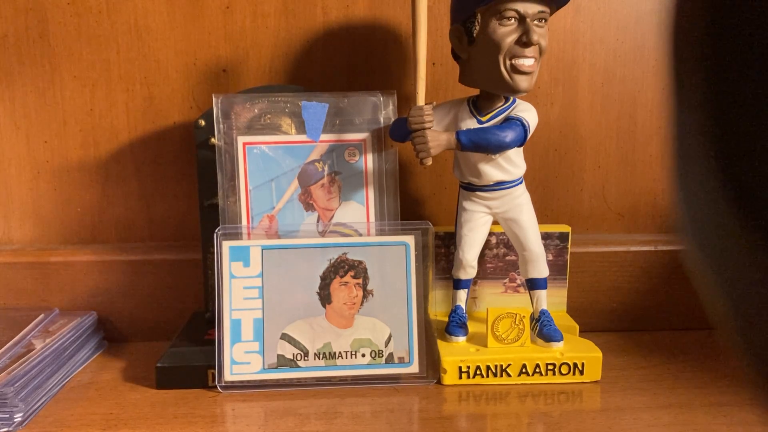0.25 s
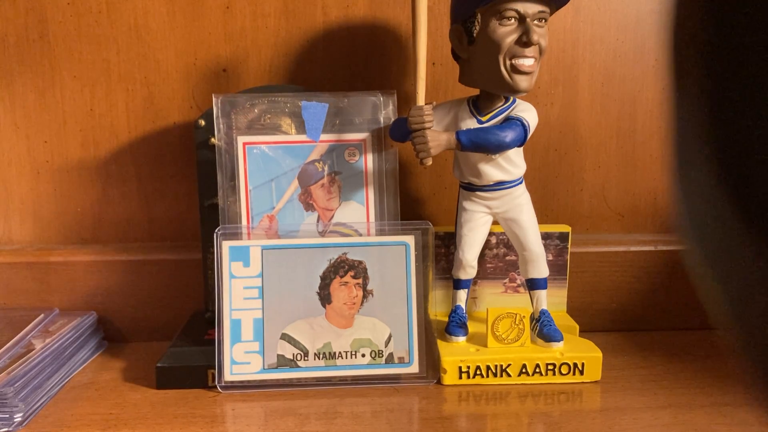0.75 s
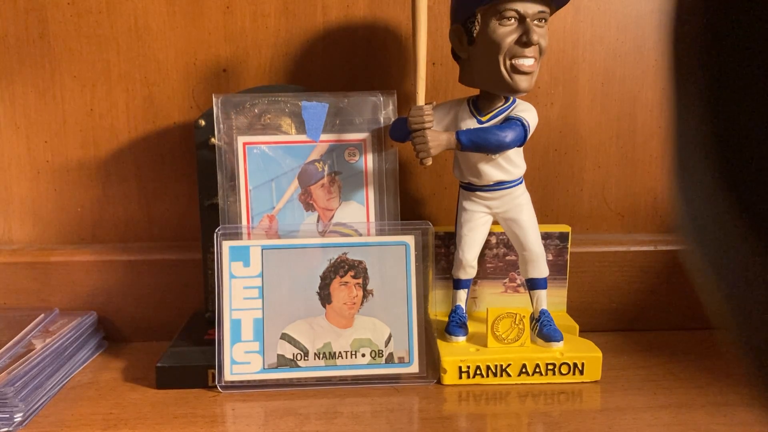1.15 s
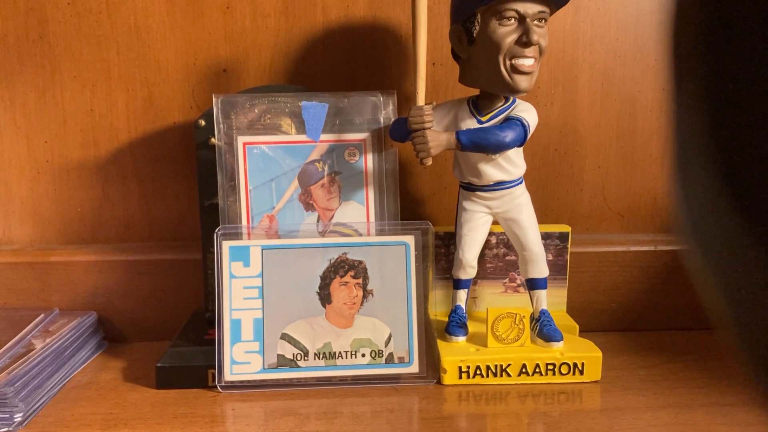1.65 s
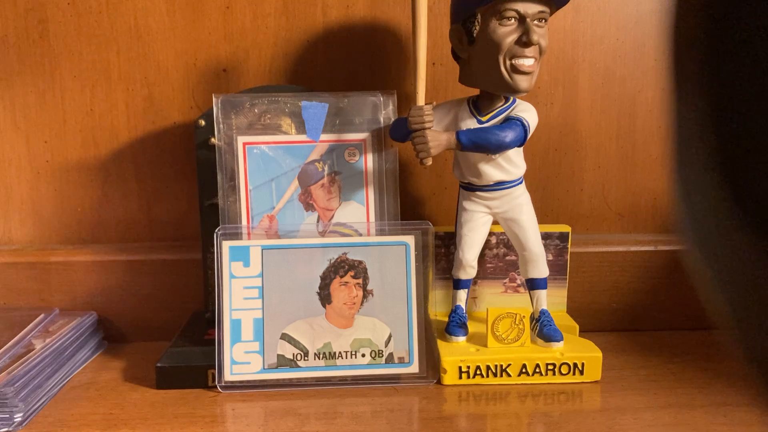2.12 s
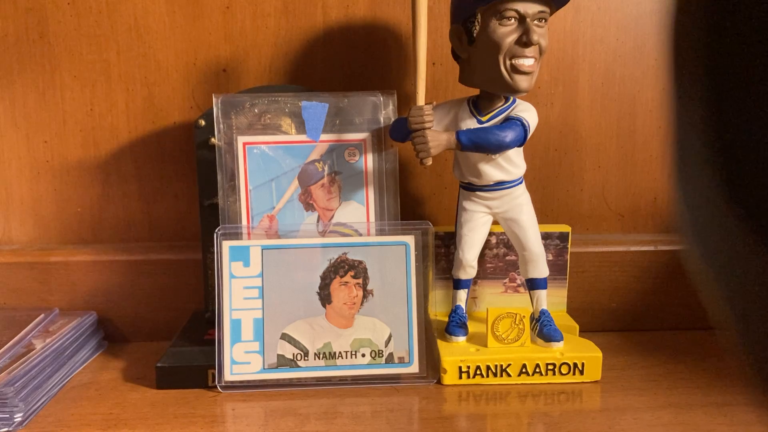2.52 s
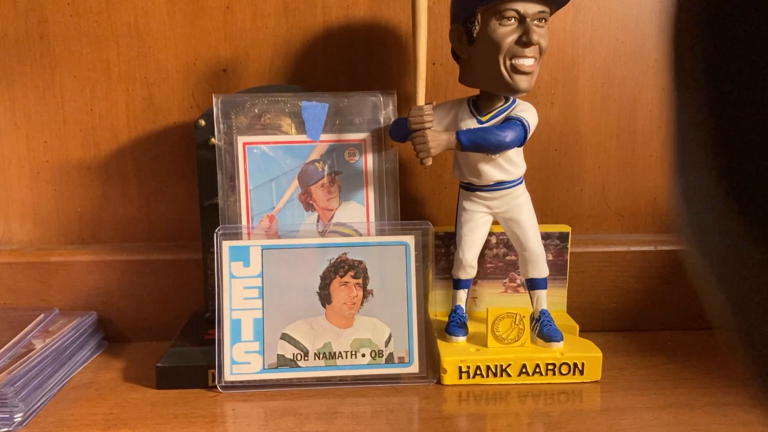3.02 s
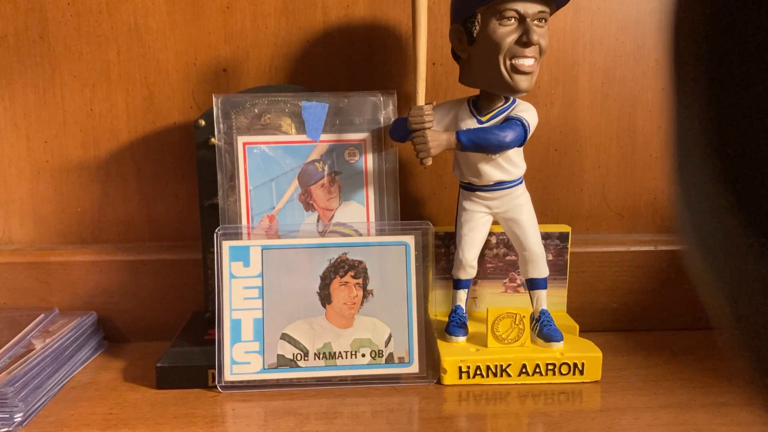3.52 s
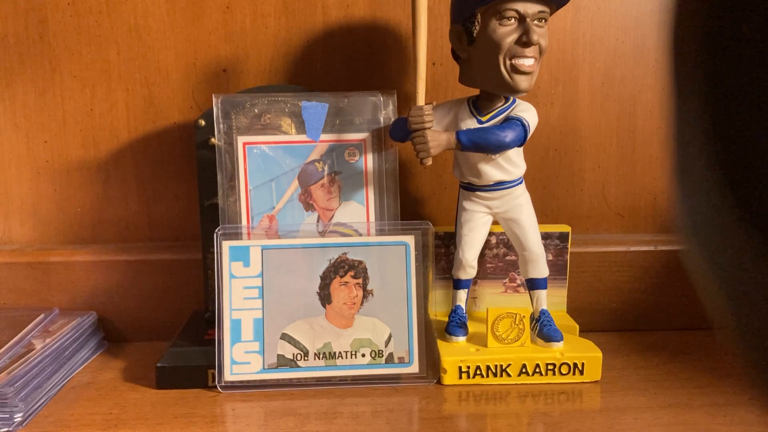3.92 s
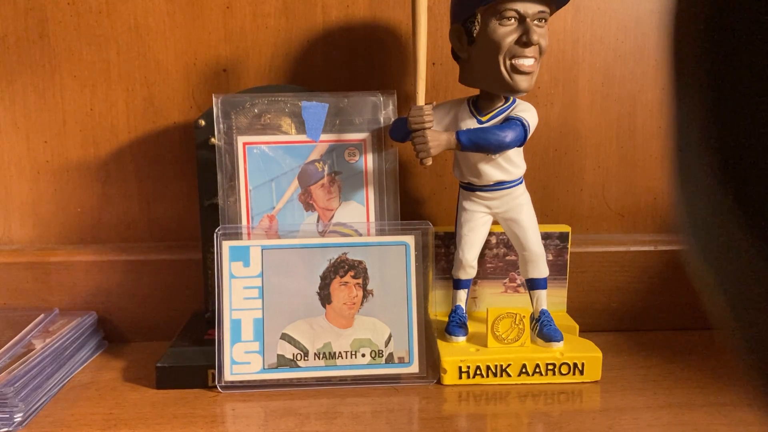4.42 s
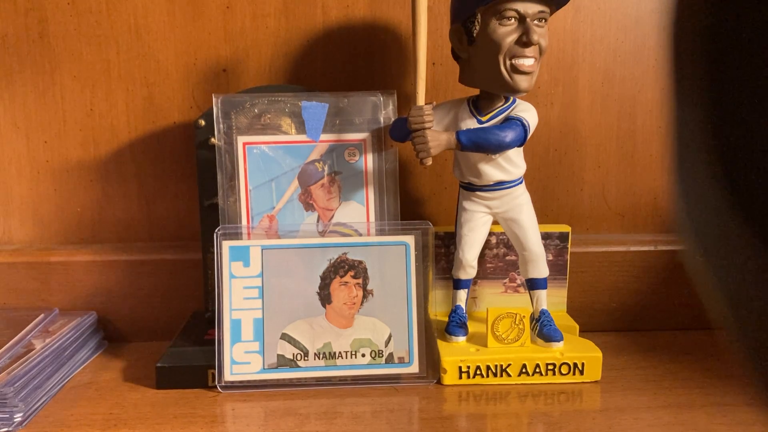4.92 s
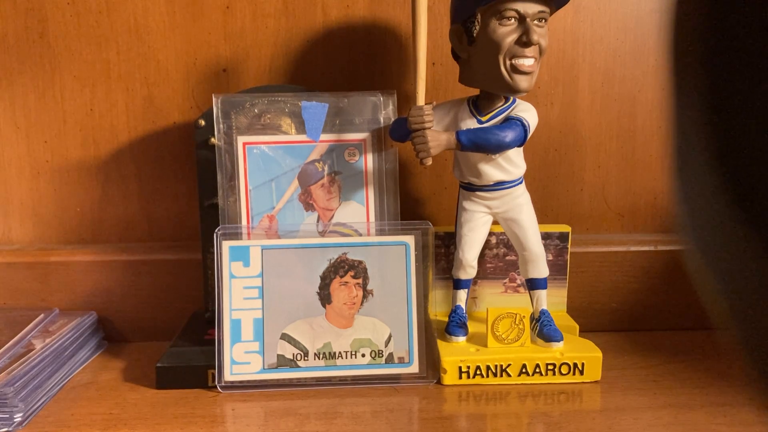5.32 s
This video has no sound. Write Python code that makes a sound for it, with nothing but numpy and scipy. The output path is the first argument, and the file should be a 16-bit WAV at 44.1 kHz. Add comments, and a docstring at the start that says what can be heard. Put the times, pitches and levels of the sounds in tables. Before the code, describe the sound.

A card is worked into a soft sleeve and rigid plastic holder close to the microphone on a wooden desk. Crisp snaps and brief rustles fill the first second, then sparse ticks lead to a dense clicking bout just before three seconds. A few faint clicks follow. Low air-duct rumble and motor hum continue throughout the small indoor room.

```python
"""From start to end an air duct rumbles in the room's low modes, a motor hums and air hisses faintly.
In the first second a card is worked into a soft sleeve and a stiff plastic holder beside a phone on a
wooden desk: film rustles by stick-slip, the holder snaps by sudden release and knocks the desk.
Sparser snaps lead to a dense bout near 2.8 s; a few more follow to 5.1 s, then the room is left alone."""
import sys
import numpy as np
from scipy import signal
from scipy.fft import rfft, irfft, next_fast_len
from scipy.io import wavfile
from scipy.ndimage import uniform_filter1d, map_coordinates

SR = 44100
rng = np.random.default_rng(int(sys.argv[2]) if len(sys.argv) > 2 else 0)


def bounce(signal):
    """Save signal as a 16-bit WAV file at the path given by the first command-line argument."""
    frames = np.transpose(np.atleast_2d(signal))
    limited = np.clip(frames, -1, 1)
    pcm = np.round(limited * 32767).astype(np.int16)
    wavfile.write(sys.argv[1], SR, pcm)


N = 245545


def amp(db):
    """Level law: the amplitude gain of a level in dB."""
    return 10 ** (np.asarray(db) / 20)


def unit(x):
    """Normalization: the signal scaled to rms 1."""
    return x / np.sqrt(np.mean(x ** 2) + 1e-20)


def along(points, hz):
    """Logarithmic frequency scale: (frequency, value) points interpolated on it."""
    f, v = np.transpose(points)
    return np.interp(np.log(hz + 1), np.log(f + 1), v)


def curves(rows):
    """Linear interpolation in time: one curve for each column after the time."""
    s, *columns = np.transpose(rows)
    return [np.interp(np.arange(N) / SR, s, column) for column in columns]


def wobble(rate):
    """Slow random modulation: a smooth curve through rate random knots a second."""
    knots = rng.standard_normal(int(N * rate / SR) + 4)
    return map_coordinates(knots, [np.arange(N) * rate / SR])


def filtered(x, response):
    """Linear filtering: the spectrum times a complex response of frequency."""
    m = next_fast_len(x.shape[-1] + SR // 8)
    spectrum = rfft(x, m) * response(np.fft.rfftfreq(m, 1 / SR))
    return irfft(spectrum, m)[..., :x.shape[-1]]


def modes(table):
    """Modal superposition: damped resonances of alternating sign, rolled off above the top one."""
    top_hz = 1.53 * max(table)[0]

    def response(f):
        total = 0
        for k, (centre, width, db) in enumerate(table):
            damping = 1j * f * width
            total = total + (-1) ** k * amp(db) * damping / (centre ** 2 - f ** 2 + damping)
        return total / (1 + 1j * f / top_hz) ** 2
    return response


def standing(table):
    """Incoherent standing waves: modal powers add, with steep skirts and no phase."""
    def response(f):
        power = 0
        for centre, width, db in table:
            damping = (f * width) ** 2
            power = power + amp(2 * db) * damping ** 2 / ((centre ** 2 - f ** 2) ** 2 + damping) ** 2
        return np.sqrt(power)
    return response


def leaning(points):
    """Level difference between sides: half the balance in dB added left, half taken right."""
    return lambda hz: amp(np.outer([.5, -.5], along(points, hz)))


def pair(alike):
    """Partial coherence: left and right noise whose likeness depends on frequency."""
    def mix(hz):
        turn = np.arccos(np.clip(alike(hz), -1, 1)) / 2
        return np.array([np.cos(turn), np.sin(turn)])
    mid, side = filtered(rng.standard_normal((2, N)), mix)
    return np.array([mid + side, mid - side])


def patchy(x, depth_db):
    """Time-frequency modulation: random gain patches, about 340 Hz by 30 ms."""
    z = signal.stft(x, nperseg=512)[2]
    field = uniform_filter1d(rng.standard_normal(z.shape[1:]), size=4, axis=0)
    field = uniform_filter1d(field, size=5, axis=1)
    return signal.istft(z * amp(depth_db * unit(field)), nperseg=512)[1][:, :N]


# Swell and sag of the rumble: (time [s], lowest-mode level [dB], upper-mode level [dB])
DUCT_SWELL = [(0, -52.5, -50.5), (1.3, -50.5, -50), (2.0, -55, -53), (2.4, -56.5, -49.5),
              (2.56, -42.5, -49.5), (2.84, -57, -50), (3.0, -49, -51.5), (3.8, -52, -46), (4.7, -48.5, -51),
              (5.0, -51.5, -52.5), (5.57, -53, -52)]
# Lowest room modes: (frequency [Hz], width [Hz], relative level [dB])
LOWEST_MODES = [(52.2, 14, -1.5), (72.5, 29, -17.5)]
# Upper room modes: (frequency [Hz], width [Hz], relative level [dB])
UPPER_MODES = [(103, 17.4, -2), (118.6, 5.4, -1.5), (132.9, 9.7, -1.5), (146.8, 10.4, -9), (162, 27, -15.5)]


def duct_rumble():
    """Room resonance: nearly coherent duct noise drives two groups of standing waves."""
    lowest_db, upper_db = curves(DUCT_SWELL)
    push = pair(lambda hz: 0.98 + 0 * hz)
    rumble = amp(lowest_db) * unit(filtered(push, standing(LOWEST_MODES)))
    return rumble + amp(upper_db) * unit(filtered(push, standing(UPPER_MODES)))


# Motor tones: (frequency [Hz], nominal rms level [dB])
MOTOR_TONES = [(120, -55), (360, -67.5)]


def motor_hum():
    """Periodic excitation: steady sine tones wavering in level and phase."""
    t, hum = np.arange(N) / SR, np.zeros(N)
    for hz, db in MOTOR_TONES:
        level = np.sqrt(2) * amp(db + 2.2 * wobble(7.3))  # rms to peak
        hum += level * np.sin(2 * np.pi * hz * t + 0.58 * wobble(3.83))
    return hum


# Spectrum of the air hiss: (frequency [Hz], relative density [dB per Hz])
AIR_SPECTRUM = [(40, -21.5), (190, 1.5), (270, -7), (340, -2), (440, -7.5), (510, 0.5), (620, -3),
                (720, -12), (1300, -18.5), (2000, -29), (3200, -37), (5500, -42.5), (9000, -45),
                (14000, -47.5), (14800, -57), (16000, -63)]
# Coherence of the hiss: (frequency [Hz], left-right likeness [0 to 1])
AIR_COHERENCE = [(150, 1), (300, 0.077), (650, 0.35), (1400, 0.19)]
# Balance of the hiss: (frequency [Hz], left over right [dB])
AIR_BALANCE = [(150, -2.5), (400, 2), (1400, 1), (2600, 1.5), (6000, -0.5)]


def air_hiss():
    """Broadband flow noise: partly coherent, patchy noise with a shaped spectrum."""
    noise = patchy(pair(lambda hz: along(AIR_COHERENCE, hz)), depth_db=1.62)
    air = filtered(noise, lambda hz: amp(along(AIR_SPECTRUM, hz)) * leaning(AIR_BALANCE)(hz))
    return amp(-56 + 0.28 * wobble(3.21)) * unit(air)


def room_tone():
    """Superposition: duct and motor, weaker on the left, plus air hiss."""
    return (duct_rumble() + motor_hum()) * amp([[-.9], [.9]]) + air_hiss()


# Reverberation: (frequency [Hz], 60 dB decay time [s])
ROOM_DECAY = [(300, 1), (2000, 0.24), (6000, 0.14), (14000, 0.21)]


def room(x, size):
    """Diffuse reverberation: a noise tail, each frequency decaying at its own speed."""
    hz, t, z = signal.stft(rng.standard_normal((2, size)), SR, nperseg=256)
    decay = amp(-60 * t / along(ROOM_DECAY, hz)[:, None])
    tail = signal.istft(z * decay, SR, nperseg=256)[1]
    return signal.fftconvolve(x, tail / np.linalg.norm(tail[0]), axes=1)[:, :size]


HEARD = SR // 5  # samples for which one jolt is followed
RATTLE_T60_S, RATTLE_SPREAD_DB = 0.028, 2  # decay of the after-slips; their unevenness
RATTLE_ALIKE = 0.34  # left-right likeness of after-slips


def jolt(rattle_db):
    """Impulsive release: a sharp pulse, a decaying rattle of after-slips and the room's answer."""
    t = np.arange(HEARD) / SR
    noise = rng.standard_normal((4, HEARD))
    release = (t == 0) + 0.03 * noise[0] * amp(-60 * t / 0.0018)
    slips = np.sqrt(RATTLE_ALIKE) * noise[1] + np.sqrt(1 - RATTLE_ALIKE) * noise[2:]
    steps = rng.standard_normal(HEARD // 40 + 1)  # a new strength about each millisecond
    uneven_db = RATTLE_SPREAD_DB * np.repeat(steps, repeats=40)[:HEARD]
    fade = amp(-60 * t / RATTLE_T60_S) * (1 - np.exp(-t / 0.00028))
    rattle = slips * fade * amp(uneven_db)
    # Unevenness leaves the energy of the fade unchanged.
    rattle *= np.linalg.norm(fade) / np.linalg.norm(rattle, axis=1, keepdims=True)
    force = release + amp(rattle_db) * rattle
    return force + amp(-13.0) * room(force, HEARD)


# The holder meets the desk: (time [s], peak level before the path [dB])
DESK_KNOCKS = [(0.406, -47.5), (0.681, -39), (0.892, -71), (2.767, -42), (2.773, -52), (2.786, -39),
               (2.798, -52), (4.927, -50)]
# Resonances of the desk top: (frequency [Hz], width [Hz], relative level [dB])
DESK_MODES = [(257, 130, 8.5), (367, 185, 7), (637, 860, -11.5), (1050, 510, -13)]
KNOCK_RATTLE_DB = -13.5  # after-slips of a knock against its release


def knocks():
    """Structural resonance: a jolt heard through the modes of the desk top alone."""
    out = np.zeros((2, N + SR))
    for s, db in DESK_KNOCKS:
        thud = filtered(jolt(KNOCK_RATTLE_DB), modes(DESK_MODES))
        start = round(s * SR)
        out[:, start:start + HEARD] += amp(db) * thud / np.abs(thud).max()
    return out[:, :N]


# Strokes of the film: (start [s], length [s], nominal lip level [dB],
# card body against it [dB], film sheen against it [dB])
FILM_STROKES = [(-.05, 0.61, -73.5, 5, -37), (0.202, 0.053, -64.5, 7.5, 0), (0.279, 0.063, -69, 4, 1.5),
                (0.386, 0.016, -53.5, 2.5, -5), (0.402, 0.054, -63.5, -20, 1),
                (0.586, 0.095, -69, 3.5, -10), (0.641, 0.087, -66.5, 3, -11),
                (0.79, 0.068, -76.5, 5.5, -24), (0.882, 0.025, -68, 7, -6), (0.997, 0.12, -68, -6, -6.5),
                (1.533, 0.054, -83, -18, 1.5), (1.714, 0.082, -72.5, 6.5, -6), (2.257, 0.062, -68.5, 4, -8),
                (2.694, 0.068, -75, 5, -11), (2.756, 0.029, -52, -1, 3), (2.767, 0.037, -58.5, 3.5, 5.5),
                (2.806, 0.033, -60.5, 10, -6.5), (2.84, 0.051, -66, 7.5, -0.5),
                (2.908, 0.039, -65.5, 3.5, -11), (3.006, 0.064, -72, -1, -4), (3.071, 0.052, -70.5, 1, -9),
                (3.11, 0.11, -76, 7.5, -23), (3.494, 0.068, -88, 19, -9), (4.232, 0.084, -75.5, 4, -8),
                (4.61, 0.05, -84.5, 15, -4), (4.92, 0.0083, -67.5, 7.5, -18)]
# Resonances of the holder's lips: (frequency [Hz], width [Hz], relative level [dB])
LIP_MODES = [(2940, 450, 0), (4500, 1540, 11.5), (5500, 3000, 10), (7000, 2800, -22)]
# Resonances of the bending card: (frequency [Hz], width [Hz], relative level [dB])
CARD_MODES = [(1090, 2900, -1.5), (1740, 480, -7.5), (1860, 580, -0.5), (2750, 29, 9.5)]
# Resonances of the thin film: (frequency [Hz], width [Hz], relative level [dB])
FILM_MODES = [(7880, 3700, 5.5), (9900, 4600, 8.5), (15200, 790, 0.5)]
RUB_THUD_DB = -26  # the desk under a stroke, against the card body
RISE_SHARE, RISE_MAX_S = 0.39, 0.035  # swell as a share of the stroke; its longest duration
SAG_DB, FADE_T60_S = 3, 0.2  # sag from swell to end of stroke; decay after it


def stroke_shape(s, length):
    """Amplitude envelope: a stroke swells, sags to its end, then decays exponentially."""
    t = np.arange(N) / SR
    rise = min(RISE_SHARE * length, RISE_MAX_S)
    swell = np.clip((t - s) / rise, 0, 1) ** 2
    sag_db = SAG_DB * np.clip((t - s - rise) / (length - rise), 0, 1)
    fade_db = 60 * np.clip(t - s - length, 0, None) / FADE_T60_S
    return swell * amp(-sag_db - fade_db)


def rustle():
    """Stick-slip friction: noise roughened by tiny slips excites lips, card, film and desk."""
    power = np.zeros((4, N))
    for s, length, db, body_db, sheen_db in FILM_STROKES:
        levels_db = db + np.array([0, body_db, sheen_db, body_db + RUB_THUD_DB])
        power += np.outer(amp(levels_db), stroke_shape(s, length)) ** 2
    # About 700 slips a second, each falling to 1/e in 0.4 ms.
    slips = (rng.random(N) < 700 / SR) * amp(2.3 * rng.exponential(size=N).clip(0, 3))
    grit = 1 + 0.9 * signal.lfilter([1], [1, -.94], slips)
    # Creases catch at ever new pitches.
    drag = patchy(grit * pair(lambda hz: 0.5 + 0 * hz), depth_db=0.7)
    out = np.zeros((2, N))
    for part_power, table in zip(power, [LIP_MODES, CARD_MODES, FILM_MODES, DESK_MODES]):
        level = np.sqrt(part_power) * amp(0.63 * wobble(60))
        out += level * unit(filtered(drag, modes(table)))
    return out


# Snaps of the plastic: (time [s], nominal peak level [dB], lip pitch [Hz], card pitch [Hz],
# card body against the peak [dB], film sheen against it [dB], after-slips against the release [dB])
PLASTIC_SNAPS = [(0.228, -44.5, 4840, 2340, -4.5, -22, -13.5), (0.3466, -49.5, 3680, 1980, 8.5, -17, -19),
                 (0.3877, -51, 6200, 1510, 10, -6, -18), (0.3905, -45, 5210, 2200, -6, 4, -15),
                 (0.3952, -52, 3300, 1500, 6, -7, -16), (0.3972, -46, 5400, 1740, -3, -8, -11),
                 (.4098, -47, 4000, 2080, 8, -17, -30), (0.415, -50.5, 3000, 1940, 14, -6, -21),
                 (0.4187, -49, 3000, 1200, 11, -9, -27), (0.4477, -24.5, 4650, 2900, -3.5, -10, -21.5),
                 (0.4483, -31, 6400, 3340, -8, -16, -27), (0.45, -38, 7400, 2880, -1, 4, -17),
                 (0.6281, -25, 5430, 2090, -4.5, -10.5, -20.5), (0.632, -46, 5000, 2100, 5, -5, -17),
                 (0.675, -53, 4500, 2100, -8, -12, -12), (0.678, -33, 4240, 2900, -18, -14, -19),
                 (0.6808, -31.5, 7700, 2070, 1, -13, -19), (0.831, -51.5, 4420, 2060, 6, -37, -21.5),
                 (.8927, -53, 5500, 2050, 7, -9, -11), (0.897, -56, 3600, 1900, 5, -23, -18),
                 (0.9, -57.5, 7400, 2700, 12.5, -4, -11), (0.9035, -54, 7330, 2670, 8, -4, -17),
                 (0.9058, -52.5, 5040, 1920, 17.5, -7, -19), (0.912, -56, 5040, 1280, 15, -16, -24),
                 (0.919, -68, 5600, 1900, 14, -10, -20), (1.7437, -63, 4730, 1790, 13, -23, -21),
                 (1.754, -61, 4700, 1780, 14, -23, -20), (1.7619, -49, 3500, 1770, -4, -26, -26),
                 (1.763, -64, 4600, 1780, 15, -26, -21), (1.768, -51, 3630, 1900, -4, -26, -17),
                 (1.7865, -54, 3500, 2700, -4, -26, -17), (1.791, -58, 4900, 2700, 2, -15, -14),
                 (1.817, -58, 3500, 1910, 3, -29, -14.5), (2.278, -40.5, 5000, 2140, -10, -10, -23),
                 (2.2972, -32.5, 5080, 2150, -9, -17, -21.5), (2.301, -51.5, 11700, 2170, -17, 5, -12),
                 (2.318, -47, 4800, 2100, -20, -11, -14), (2.72, -56.5, 4700, 2120, 8.5, -8, -17.5),
                 (2.7634, -33.5, 5900, 2460, -5.5, -20, -9.5), (2.7636, -35.5, 15200, 2400, -18, -8, -7),
                 (2.7668, -35.5, 4360, 1710, -2, -6, -17.5), (2.7688, -43, 6740, 1700, -18, -8, -10),
                 (2.773, -37, 6290, 1710, 3, -15, -30), (2.802, -35.5, 6500, 1680, -6, -3, -17.5),
                 (2.822, -56, 4350, 2100, 14, -13, -12), (2.783, -50, 5000, 1700, 15, -10, -17),
                 (2.794, -55, 5000, 2000, 12, -10, -19), (2.831, -56, 4500, 2000, 13, -10, -23),
                 (2.839, -46, 5500, 1970, 0, -16, -21), (2.8609, -52, 6360, 1890, 12, -2, -16),
                 (2.8705, -50, 5500, 1790, 3, -10, -19), (2.905, -51.5, 5500, 1500, -16, 9, -18.5),
                 (2.935, -49, 5000, 2000, -9, -14, -15.5), (2.943, -51, 4940, 1980, 2, -17, -15.5),
                 (3.028, -56, 4800, 2100, 0, -16, -14), (3.1446, -42.5, 5880, 2440, 3.5, -43, -22),
                 (3.146, -56, 4360, 1740, 15, -40, -16), (3.1485, -54, 4300, 1740, 15, -40, -19),
                 (3.175, -66, 5900, 2000, 5, -30, -16), (3.303, -72, 4350, 2400, 16, -19, -12),
                 (4.005, -69, 6600, 2020, 7, -29, -14), (4.2535, -69, 4000, 2000, -12, -13, -16),
                 (4.2595, -64.5, 5000, 1900, -8, -9, -3), (4.281, -60, 5000, 2000, -1, -21, -17),
                 (4.317, -61, 6600, 2000, 5, -6, -18.5), (4.566, -75.5, 5500, 2000, -2, 12.5, -16.5),
                 (4.609, -68, 4500, 1800, 12, -23, -19), (4.627, -67, 5000, 2200, -4, -23, -25),
                 (4.6362, -55, 4400, 2300, 2, -16, -28), (4.639, -59.5, 3280, 2500, 7.5, -23, -17),
                 (4.646, -62, 3100, 2900, 2, -25, -18), (4.9267, -41, 6160, 2060, 1.5, -21, -22),
                 (4.9272, -53, 3600, 2460, 8, -20, -26), (4.9295, -61, 5700, 2400, 14.5, -4, -17),
                 (5.114, -60, 4600, 2430, 6, -10, -14.5)]
# Resonances of the holder's flat: (frequency [Hz], width [Hz], mean relative level [dB])
FLAT_MODES = [(1246, 49, 1), (3500, 74, 1.5), (4020, 61, -2.5), (5040, 63, -4.5), (7330, 110, 0.5)]
RING_SPREAD_DB = 2  # each snap shares its force anew among the flat's modes
LIP_WIDTH_HZ, SNAP_THUD_DB = 1890, -21  # ring of the lip; the desk against the peak
CARD_WIDTH_HZ, CARD_REST_DB = 200, -9  # ring of the card where held; level of its other modes


def snap_colour(lip_hz, card_hz, body_db, sheen_db):
    """Modal superposition: one snap's response of lips, holder flat, card, film and desk."""
    lip = modes([(lip_hz, LIP_WIDTH_HZ, 0)])
    held_card = modes([(card_hz, CARD_WIDTH_HZ, 0)])
    flat = modes([(hz, width, db + RING_SPREAD_DB * rng.standard_normal())
                  for hz, width, db in FLAT_MODES])
    edge, body, film, desk = [modes(m) for m in (LIP_MODES, CARD_MODES, FILM_MODES, DESK_MODES)]

    def response(f):
        lips = 3.92 * lip(f) ** 2 + amp(-11.5) * edge(f)
        card = flat(f) + amp(14.0) * held_card(f) + amp(CARD_REST_DB) * body(f)
        surfaces = amp(sheen_db) * film(f) + amp(SNAP_THUD_DB) * desk(f)
        return lips + amp(body_db) * card + surfaces
    return response


def snaps():
    """Sudden release of strain: each snap jolts the holder, the card, the film and the desk."""
    out = np.zeros((2, N + SR))
    to_peak = SR / (2 * np.pi * LIP_WIDTH_HZ)  # a wider resonance answers a pulse more strongly
    for s, db, lip_hz, card_hz, body_db, sheen_db, rattle_db in PLASTIC_SNAPS:
        colour = snap_colour(lip_hz, card_hz, body_db, sheen_db)
        start = round(s * SR)
        out[:, start:start + HEARD] += amp(db) * to_peak * filtered(jolt(rattle_db), colour)
    return out[:, :N]


# Balance of the near sound: (frequency [Hz], left over right [dB])
NEAR_BALANCE = [(300, 3), (1000, 9), (1900, -2.5), (3100, -2.5), (4300, 1.5), (5800, -1), (7500, -2.5)]
# The phone's body turns the phase of the right side: (frequency [Hz], lag [radians])
BODY_PHASE = [(1000, -.6), (2000, -1.1), (2800, 0), (3500, .8), (4700, .4), (6500, .2)]
HANDS_LAG = 0.00039  # s, the hands are nearer the left port


def scene():
    """Diffraction and path difference: the phone's body shades the near hands; the room is added."""
    def path(hz):
        lag = 2 * np.pi * HANDS_LAG * hz + along(BODY_PHASE, hz)
        return leaning(NEAR_BALANCE)(hz) * np.exp(-1j * np.outer([0, 1], lag))
    return room_tone() + filtered(knocks() + rustle() + snaps(), path)


# Treble the right side takes from the left port: (frequency [Hz], amplitude share [0 to 1])
SHARED_TREBLE = [(6200, 0.0018), (7400, 0.39), (8500, 0.97), (9500, 1), (16000, 1)]
PORT_LAG, TOP_HZ = 0.0002192, 15900  # advance of the right side [s]; band limit [Hz]


def record(dry):
    """Cross-coupling and time advance: the right side takes inverted left treble and runs early."""
    share = lambda hz: np.clip(along(SHARED_TREBLE, hz), 0, 1)
    own = filtered(dry[1], lambda hz: np.sqrt(1 - share(hz) ** 2))
    right = own - filtered(dry[0], share)
    right = filtered(right, lambda hz: np.exp(2j * np.pi * hz * PORT_LAG))
    return filtered(np.array([dry[0], right]), lambda hz: hz < TOP_HZ)


dry = scene()
out = record(dry)
bounce(out)
```